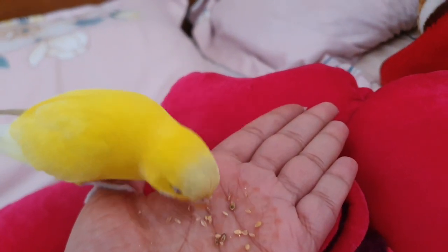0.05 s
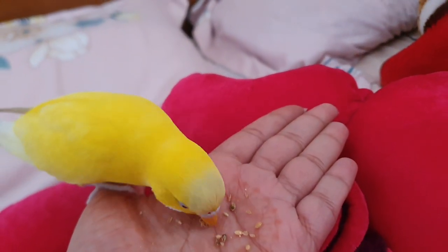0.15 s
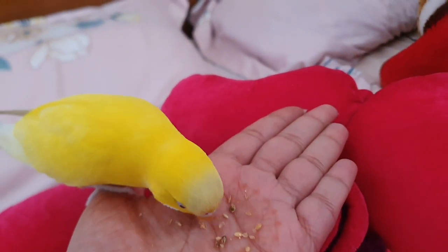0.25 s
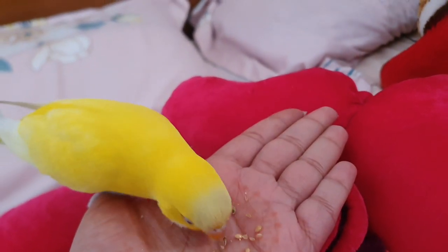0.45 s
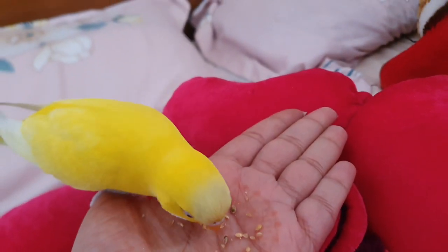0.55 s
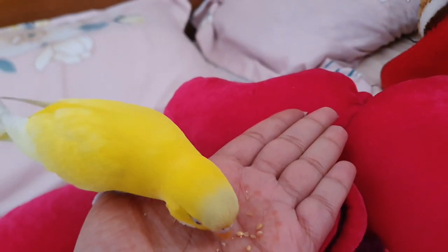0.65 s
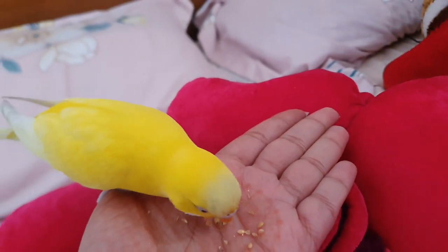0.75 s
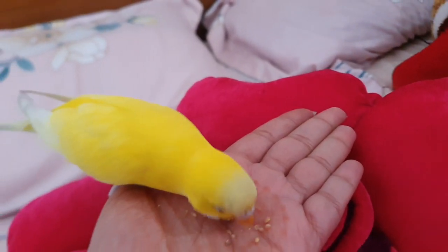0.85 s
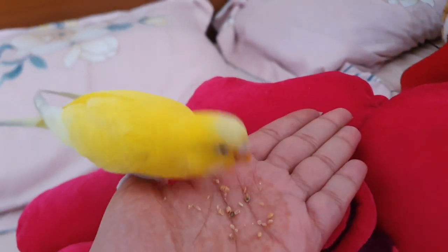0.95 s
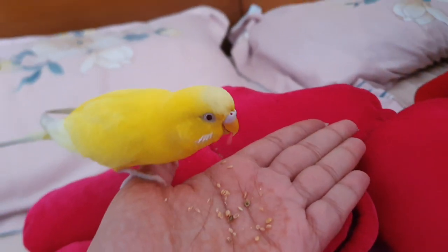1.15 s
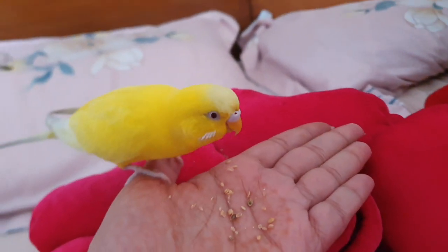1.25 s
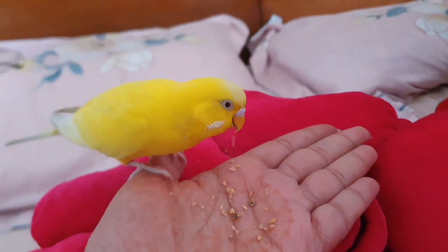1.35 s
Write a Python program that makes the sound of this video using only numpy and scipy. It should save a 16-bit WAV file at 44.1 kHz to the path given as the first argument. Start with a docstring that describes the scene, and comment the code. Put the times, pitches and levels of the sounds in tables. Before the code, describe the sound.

A small bird pecks and cracks seeds close to the microphone in a quiet room. A soft low handling rumble comes first, from about 0.2 to 0.7 seconds. Faint seed rustles and a few tiny ticks sound between 0.5 and 0.9 seconds. From 1.0 to 1.3 seconds the husks crack in a quick cluster of sharper, very high ticks over a faint hiss.

```python
"""A soft low boom comes first, over the hush of a quiet room: a hand-held recorder is being shifted.
Close to the microphone a budgie picks seeds from an open palm, and friction makes them rustle.
Then it grinds and cracks them in its beak. Each husk fractures with a tiny bright tick,
a heavily damped vibration near 12 kHz that the room answers faintly."""
import sys
import numpy as np
from scipy import signal
from scipy.fft import rfft, irfft
from scipy.io import wavfile
from scipy.ndimage import uniform_filter1d

SR = 44100
rng = np.random.default_rng(int(sys.argv[2]) if len(sys.argv) > 2 else 0)


def transcribe(signal):
    """Save signal, clipped to [-1, 1], as a 16-bit WAV file at the path in sys.argv[1]."""
    frames = np.atleast_2d(signal).T
    limited = np.clip(frames, -1, 1)
    pcm = np.round(limited * 32767).astype(np.int16)
    wavfile.write(sys.argv[1], SR, pcm)


N = 61739
T = np.arange(N) / SR

# Stereo field of the background noise: coherence (f/Hz, correlation), balance (f/Hz, left-right/dB)
COHERENCE = [(30, 1), (130, 0.93), (280, 0.84), (550, 0.41), (1100, 0.13), (16000, 0.035)]
BALANCE = [(30, 4), (130, 2), (280, 4.5), (1000, 0.5), (4500, 1.5), (9000, 3.5), (13000, 1.5)]
# Spectra of the room hush and the late hiss (f/Hz, level/dB)
HUSH_SPECTRUM = [(100, 2), (300, 4), (550, 3.5), (900, -1.5), (1800, -4.5), (3500, -7.5), (6500, -11.5),
                 (7600, -19.5), (10500, -14), (12500, -9), (15800, -17.5)]
HISS_SPECTRUM = [(300, -13), (600, -4), (1500, -6), (3500, -3.5), (6000, 2.5), (8000, -7), (12500, -1.5),
                 (15800, -3.5)]
# Envelopes of the recorder's boom and the grip's rub (t/s, relative level/dB)
BOOM_ENVELOPE = [(0.0, -61), (0.196, -58.5), (0.232, -42.5), (0.266, -44), (0.29, -40), (0.39, -37),
                 (0.414, -47), (0.444, -36.5), (0.49, -46.5), (0.576, -46), (0.606, -55), (0.662, -44.5),
                 (0.696, -65.5), (0.724, -50), (0.84, -63.5), (0.878, -53), (1.052, -60), (1.086, -52),
                 (1.204, -64), (1.226, -57), (1.268, -70.5), (1.292, -59), (1.354, -63), (1.39, -73.5)]
RUB_ENVELOPE = [(0.0, -75), (0.022, -63.5), (0.096, -70), (0.196, -65), (0.232, -52.5), (0.254, -47),
                (0.312, -56), (0.328, -49.5), (0.486, -63), (0.534, -66), (0.576, -58.5), (0.61, -62),
                (0.734, -65), (0.844, -64.5), (0.936, -64.5), (1.168, -71.5), (1.192, -74), (1.39, -78)]
# Spectra of boom, rub and skin scuff (f/Hz, level/dB)
BOOM_SPECTRUM = [(20, -44.5), (35, -27), (50, -11), (59, -7), (66, 1), (74, -6), (90, -11), (110, -14),
                 (150, -32.5), (300, -65.5), (2000, -110)]
RUB_SPECTRUM = [(20, -37.5), (60, -22), (110, 5), (175, -0.5), (280, -9.5), (380, -17), (520, -22),
                (800, -43), (2000, -52), (8000, -85)]
SCUFF_SPECTRUM = [(100, -27), (250, -3), (340, -3), (430, 2.5), (560, -4.5), (750, -20), (1300, -22.5),
                  (4000, -36), (10000, -77)]
# Resonances of the recorder's body when rubbed (f/Hz, bandwidth/Hz, lift/dB)
CASE_RESONANCES = [(180, 16, 3), (243, 18, 7), (318, 14, 6)]
# Its modes when knocked (f/Hz, level/dB, T60/s)
CASE_MODES = [(181, -6, .25), (242, 0, .32), (318, -6, .3)]
# Knocks of the grip (t/s, gain/dB, tilt/dB per octave)
GRIP_KNOCKS = [(.213, -42.5, -1), (0.317, -65.5, -32), (.635, -73, 8)]
# Spectra of seed friction, fine crackle and a husk's broad crack (f/Hz, level/dB)
RUSTLE_SPECTRUM = [(400, -5), (650, 4), (830, 9.5), (1000, 0.5), (1400, 2), (2000, 3.5), (2600, -5),
                   (3600, 5.5), (5000, -0.5), (6500, 1), (7600, -10), (12500, -10), (16000, -13)]
CRACKLE_SPECTRUM = [(3000, -23.5), (9000, -17.5), (11000, -8.5), (12600, 3.5), (13600, -4), (16000, -19)]
CRACK_SPECTRUM = [(500, -28), (1000, -10), (1600, -2), (2800, -7), (4800, -9.5), (6500, 0.5), (8500, -5),
                  (11000, 0.5), (16000, -4)]
# Seeds rubbed on the palm, husks ground in the beak (t/s, rise/s, fade/s, rustle/dB, crackle/dB)
PALM_STROKES = [(.275, 0.041, 0.031, -74, -86), (.33, 0.028, 0.027, -78, -82),
                (.506, 0.027, 0.033, -65, -77), (.548, 0.005, 0.051, -76, -79),
                (.755, 0.012, 0.031, -79.5, -81.5)]
BEAK_GRINDS = [(.89, 0.027, 0.023, -87, -76.5), (1.06, .008, .05, -77, -75.5),
               (1.185, 0.033, 0.039, -89.5, -81), (1.321, 0.011, 0.015, -81, -65.5)]
# Husk fractures (t/s, level/dB, ring f/Hz, relative crack gain/dB, left-right/dB)
HUSK_SNAPS = [(.5376, -61.5, 12200, -19, -10), (0.557, -78, 12300, -17, -8), (.5657, -60.5, 11900, -29, 7),
              (0.7644, -67, 12700, -16, -2), (.7771, -60, 12730, -30, -5), (0.8912, -70.5, 11300, -13, 11),
              (0.8976, -66.5, 12000, -6.5, 2), (0.901, -60, 12060, -5.5, 7), (.9213, -74, 11500, -25, -16),
              (.9510, -67, 12300, -13, 2), (1.0542, -48, 13000, -14.5, 1), (1.0614, -48, 14300, -4, -1),
              (1.0647, -57, 12900, -1.5, 10), (1.13, -65, 12700, -2, 2), (1.1719, -41.5, 12400, -20, -4.5),
              (1.218, -63, 12200, -7, -3), (1.2655, -58, 13800, 0, 13), (1.268, -52.5, 13600, -7.5, -8.5),
              (1.2675, -44.5, 12700, -23, -3), (1.2766, -46, 12300, -23, -6), (1.281, -57, 12800, -17, -14),
              (1.2906, -67, 13000, -10, -24), (1.3243, -60, 12700, -8, 7), (1.3341, -56, 12300, -27, -9),
              (1.3362, -64, 12600, -23, -17), (1.339, -62, 13300, -19, -9)]


def amp(db):
    """Amplitude ratio of a level in decibels."""
    return 10 ** (np.asarray(db) / 20)


def unit(x):
    """Normalisation to unit rms."""
    return x / np.sqrt(np.mean(x ** 2) + 1e-20)


def read(points, hz):
    """Interpolation on a logarithmic frequency axis."""
    f, value = np.transpose(points)
    return np.interp(np.log(hz + 1), np.log(f), value)


def sides(db):
    """Intensity panning: left and right gains for a level difference."""
    return np.array([amp(db / 2), amp(-db / 2)]).reshape(2, -1)


def add(mix, start_s, sound):
    """Superposition of a sound on the mix."""
    part = mix[:, round(start_s * SR):][:, :sound.shape[1]]
    part += sound[:, :part.shape[1]]


def colour(x, spectrum):
    """Filtering by multiplication in the frequency domain."""
    hz = np.fft.rfftfreq(x.shape[-1], 1 / SR)
    return irfft(rfft(x) * amp(read(spectrum, hz)), x.shape[-1])


def noise(spectrum, resonances=()):
    """Partially coherent stereo noise, nearly mono in the bass, with optional resonance peaks."""
    hz = np.fft.rfftfreq(N, 1 / SR)
    left, independent = rfft(rng.standard_normal((2, N)))
    coherence = np.clip(read(COHERENCE, hz), 0, 1)
    right = coherence * left + np.sqrt(1 - coherence ** 2) * independent
    peaks_db = sum(lift / (1 + (2 * (hz - f) / width) ** 2) for f, width, lift in resonances)
    gain = amp(read(spectrum, hz) + peaks_db) * sides(read(BALANCE, hz))
    return unit(irfft(np.array([left, right]) * gain, N))


def modulated(x, envelope, window_samples):
    """Amplitude modulation: the running rms is evened out, then an envelope is imposed."""
    power = np.maximum(uniform_filter1d((x ** 2).mean(0), window_samples), 0)
    return x / np.sqrt(power + 1e-4) * amp(np.interp(T, *np.transpose(envelope)))


def swell(start_s, rise_s, fade_s):
    """Linear growth, then exponential decay."""
    age = T - start_s
    return np.clip(age / rise_s, 0, 1) * np.exp(-np.maximum(age - rise_s, 0) / fade_s)


def hush(hush_db=-78, hiss_db=-78.5, hiss_start_s=1.06):
    """Stationary room noise; a second, incoherent hiss adds its power in the last part."""
    onset = np.clip((T - hiss_start_s) / 0.0048, 0, 1)
    return amp(hush_db) * noise(HUSH_SPECTRUM) + amp(hiss_db) * onset * noise(HISS_SPECTRUM)


def low_tone(db=-63, hz=260):
    """A faint pure tone swells and decays exponentially."""
    return amp(db) * swell(.905, rise_s=.065, fade_s=.022) * np.sin(2 * np.pi * hz * T) * sides(1.0)


def grip_knocks(rise_s=.042):
    """Free vibration: soft knocks set the damped modes of the recorder's body ringing."""
    out = np.zeros((1, N))
    pivot_hz = CASE_MODES[1][0]
    for start_s, db, tilt in GRIP_KNOCKS:
        ring = np.zeros(N)
        for hz, mode_db, t60 in CASE_MODES:
            tilted_db = mode_db + tilt * np.log2(hz / pivot_hz)
            ring += amp(tilted_db - 60 * T / t60) * np.sin(2 * np.pi * hz * T)
        add(out, start_s, (amp(db) * np.minimum(T / rise_s, 1) * ring)[None])
    return out * sides(5.1)


def handling(rub_gain_db=-2, scuff_db=-68):
    """Structure-borne sound: the shifting grip makes the recorder boom and rub; skin scuffs once."""
    boom = modulated(noise(BOOM_SPECTRUM), BOOM_ENVELOPE, window_samples=1500)
    rub = modulated(noise(RUB_SPECTRUM, CASE_RESONANCES), RUB_ENVELOPE, window_samples=1300)
    scuff = swell(.772, rise_s=.024, fade_s=.042) * noise(SCUFF_SPECTRUM)
    return boom + amp(rub_gain_db) * rub + amp(scuff_db) * scuff


def reverberation(x, t60_s=.28, db=-17):
    """A diffuse field: convolution with exponentially decaying noise gives the room's faint answer."""
    t = T[:SR // 2]
    tail = rng.standard_normal((2, len(t))) * amp(-60 * t / t60_s) * np.minimum(t / 0.0045, 1)
    return amp(db) * signal.fftconvolve(x, tail / np.linalg.norm(tail[0]), axes=1)[:, :N]


def slips(spectrum, per_s=2600, spread_db=3):
    """Shot noise: tiny slips of uneven size arrive at random instants."""
    size = amp(spread_db * np.minimum(rng.exponential(1, N), 4))
    occurs = rng.random(N) < per_s / SR
    return unit(colour(size * occurs * rng.standard_normal((2, N)), spectrum))


def seed_friction(strokes):
    """Stick-slip friction: each stroke of the beak is a swell of soft rustle and fine crackle."""
    rustle = slips(RUSTLE_SPECTRUM) * sides(1.9)
    crackle = slips(CRACKLE_SPECTRUM) * sides(-2.2)
    return sum(swell(start_s, rise_s, fade_s) * (amp(rustle_db) * rustle + amp(crackle_db) * crackle)
               for start_s, rise_s, fade_s, rustle_db, crackle_db in strokes)


def husk_snap(db, hz, crack_db, pan_db):
    """Brittle fracture: a damped ring of husk and beak, a broad crack and a trail of splinters."""
    rise_s, ring_decay_s, crack_decay_s, splinter_decay_s = .00019, .00053, .0009, .0025
    beak_hz, beak_db, splinter_db = 6840, -19, -22
    lag_s = np.array([[0], [.000012]])  # the husk's tone reaches the right microphone later
    t = np.arange(0, .02, 1 / SR)
    fizz, burst, trail = rng.standard_normal((3, 2, len(t)))
    husk_tone = np.sin(2 * np.pi * hz * (t - lag_s))
    beak_tone = amp(beak_db) * np.sin(2 * np.pi * beak_hz * t)
    ring = husk_tone + beak_tone + 0.43 * unit(colour(fizz, CRACKLE_SPECTRUM))
    ring_envelope = (1 - np.exp(-(t / rise_s) ** 2)) * np.exp(-t / ring_decay_s)
    ring *= ring_envelope / ring_envelope.max()
    crack_envelope = 2 * np.minimum(t / rise_s, 1) * np.exp(-t / crack_decay_s)
    crack = amp(crack_db) * unit(colour(burst, CRACK_SPECTRUM)) * crack_envelope
    splinters = amp(splinter_db) * unit(colour(trail, CRACKLE_SPECTRUM)) * np.exp(-t / splinter_decay_s)
    return amp(db) * sides(pan_db) * (ring + crack + splinters)


def scene():
    """Superposition of the beak's direct and reverberant sound on the background."""
    beak = seed_friction(PALM_STROKES) + seed_friction(BEAK_GRINDS)
    for start_s, *snap in HUSK_SNAPS:
        add(beak, start_s, husk_snap(*snap))
    return beak + reverberation(beak) + handling() + grip_knocks() + low_tone() + hush()


def record(dry):
    """Band limiting: the recorder acts as a steep linear-phase low-pass filter."""
    cutoff_hz = 16200
    lowpass = signal.firwin(511, cutoff_hz, window=("kaiser", 9), fs=SR)
    return signal.oaconvolve(dry, lowpass[None], "same", axes=1)


dry = scene()
out = record(dry)
transcribe(out)
```